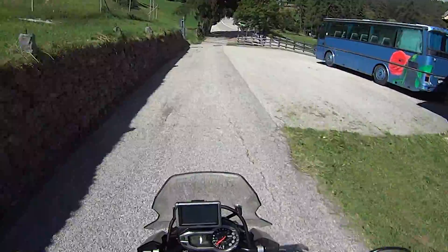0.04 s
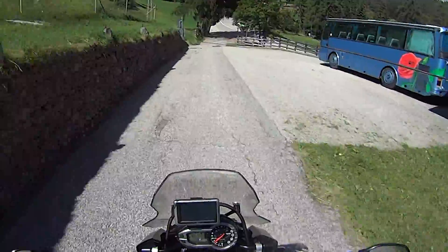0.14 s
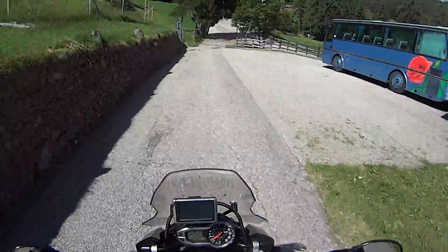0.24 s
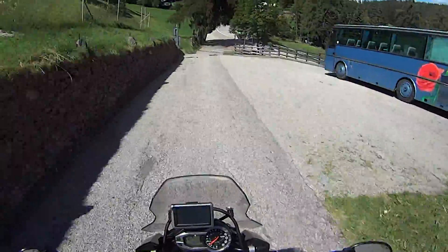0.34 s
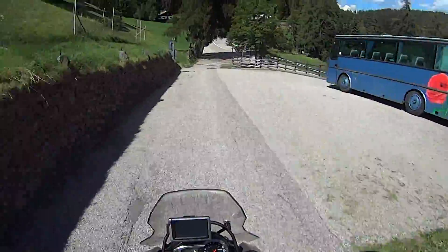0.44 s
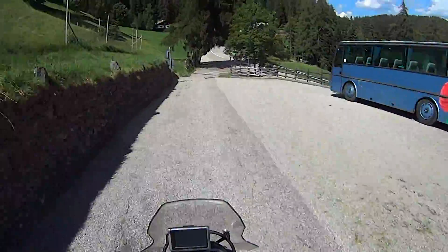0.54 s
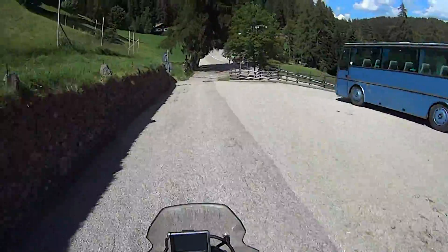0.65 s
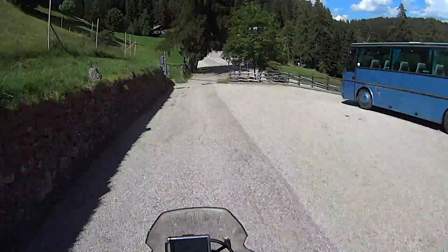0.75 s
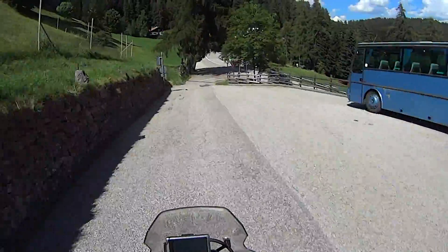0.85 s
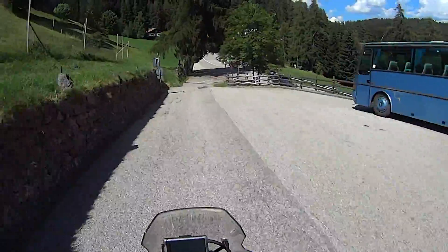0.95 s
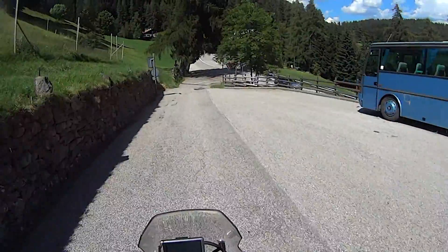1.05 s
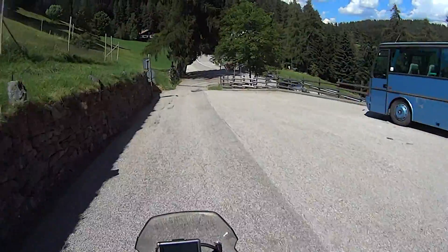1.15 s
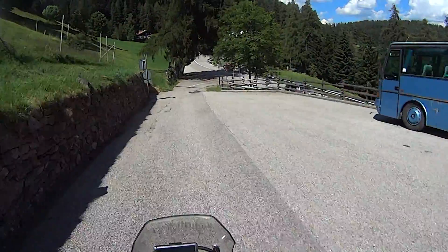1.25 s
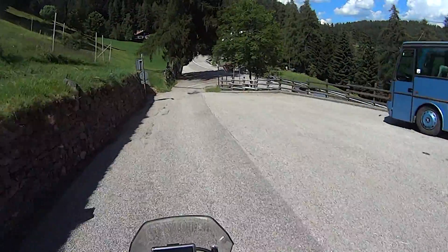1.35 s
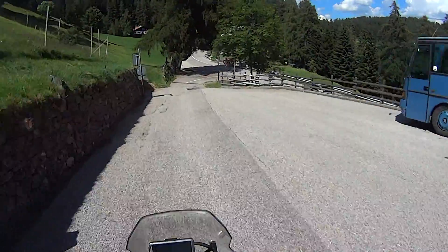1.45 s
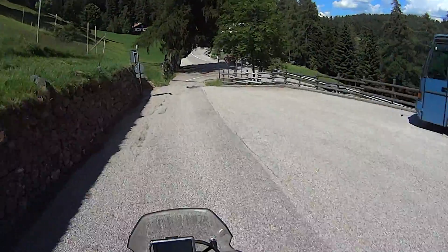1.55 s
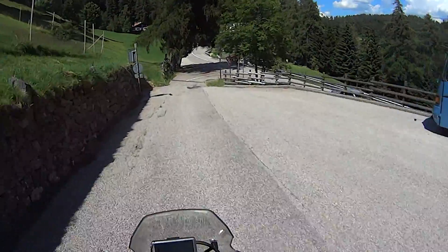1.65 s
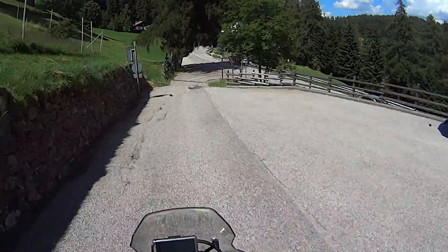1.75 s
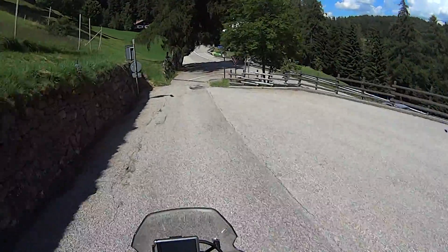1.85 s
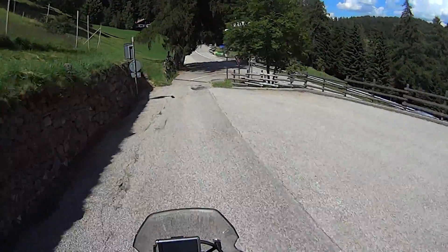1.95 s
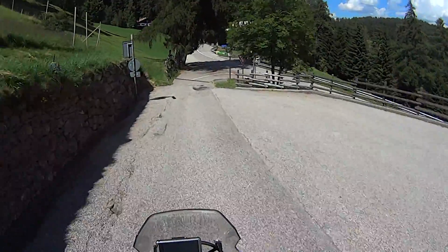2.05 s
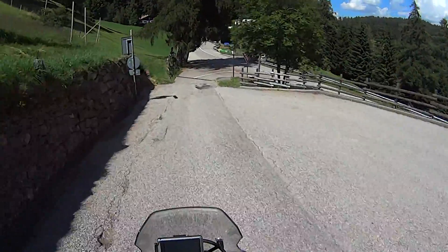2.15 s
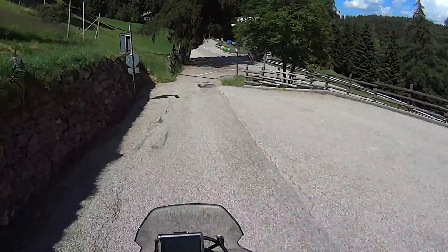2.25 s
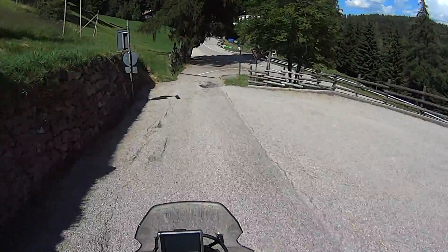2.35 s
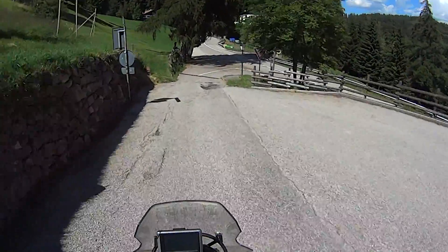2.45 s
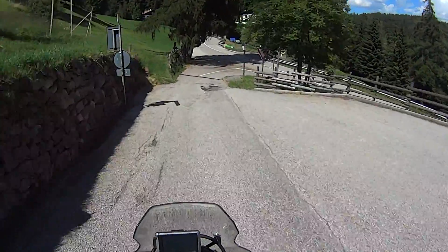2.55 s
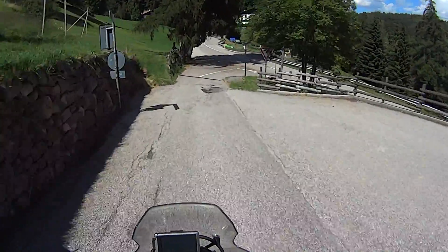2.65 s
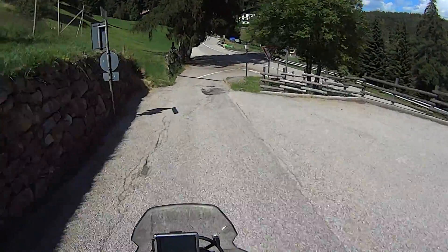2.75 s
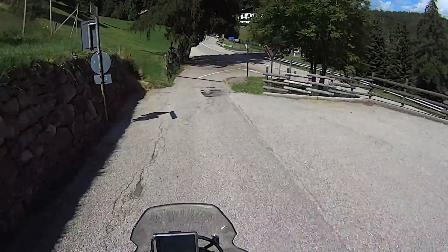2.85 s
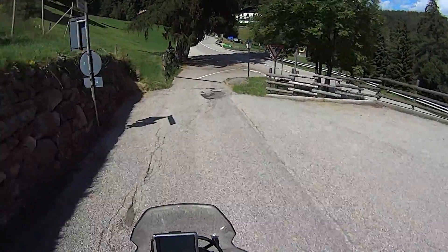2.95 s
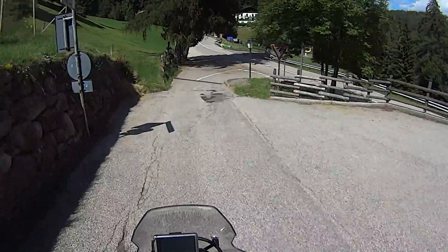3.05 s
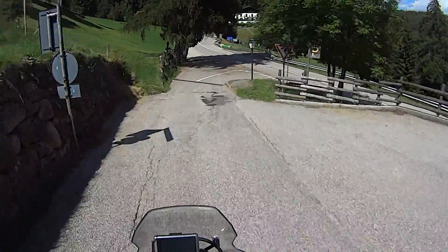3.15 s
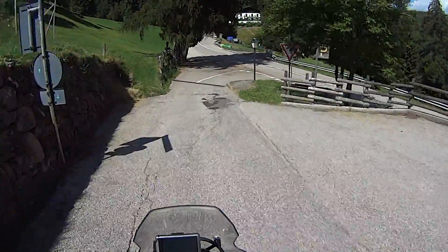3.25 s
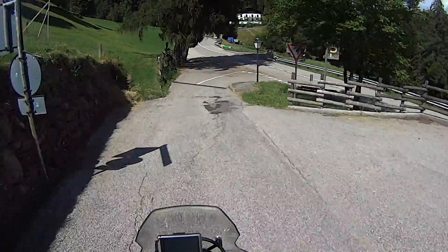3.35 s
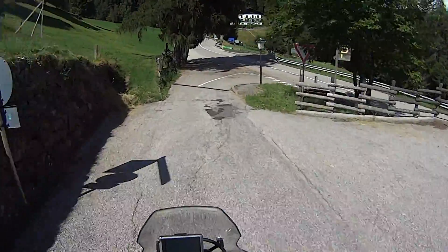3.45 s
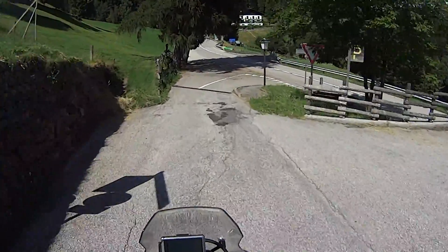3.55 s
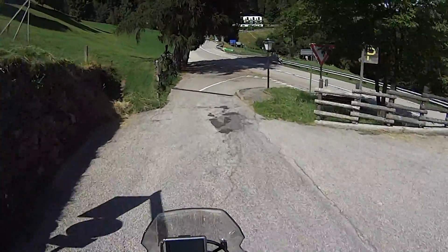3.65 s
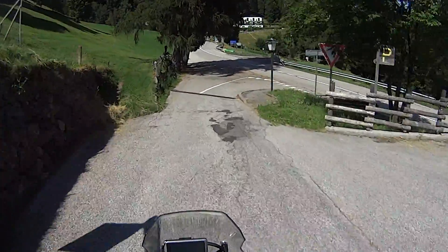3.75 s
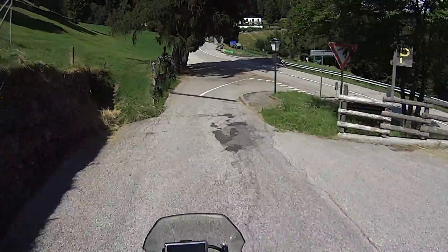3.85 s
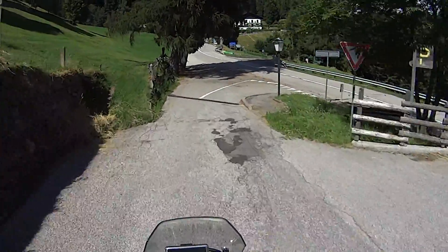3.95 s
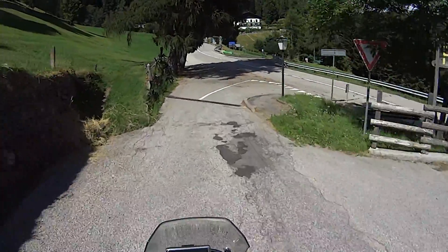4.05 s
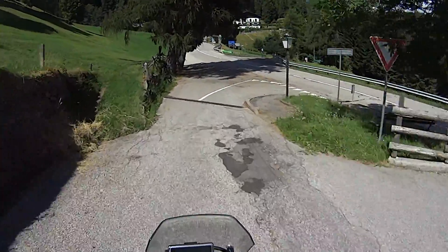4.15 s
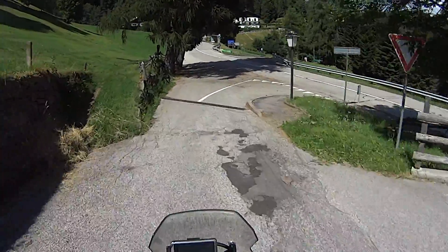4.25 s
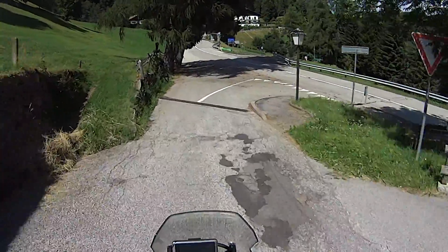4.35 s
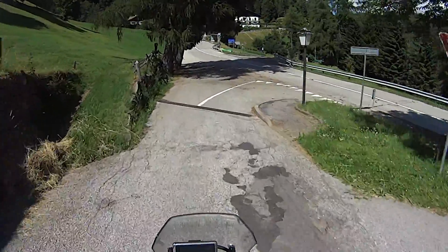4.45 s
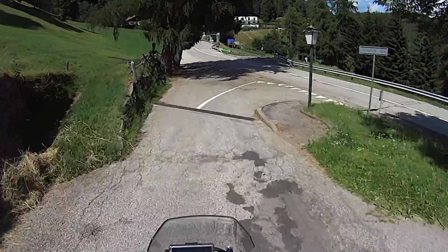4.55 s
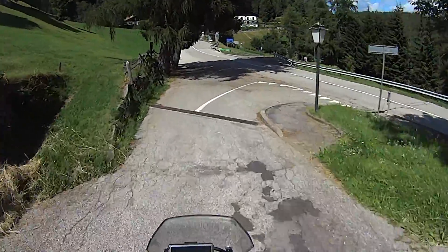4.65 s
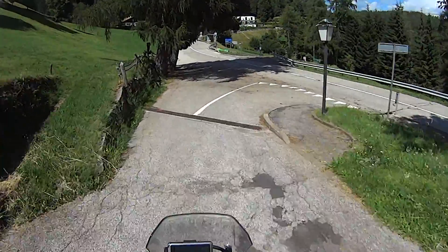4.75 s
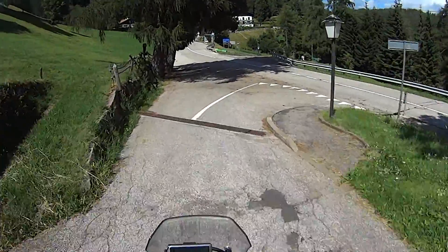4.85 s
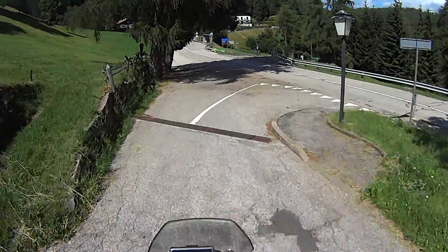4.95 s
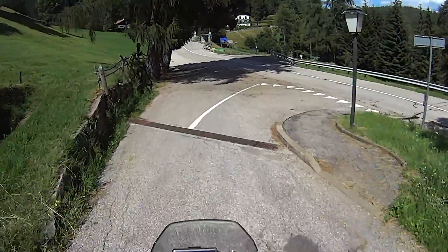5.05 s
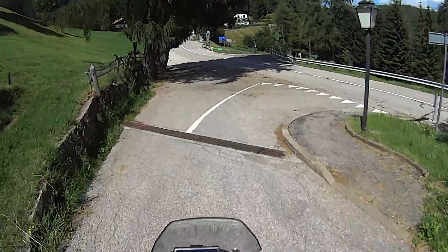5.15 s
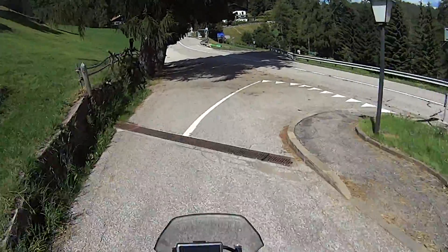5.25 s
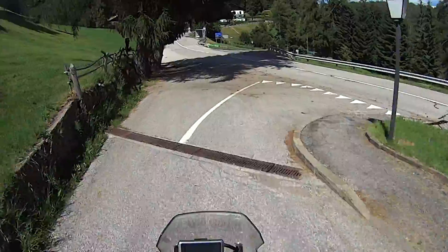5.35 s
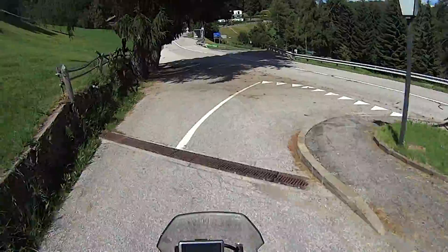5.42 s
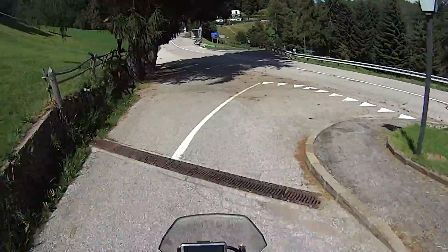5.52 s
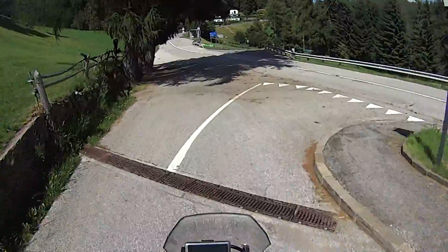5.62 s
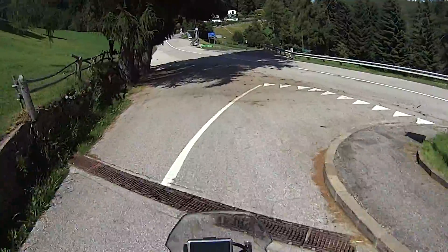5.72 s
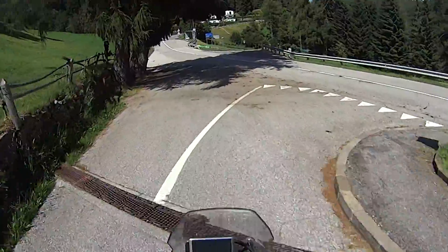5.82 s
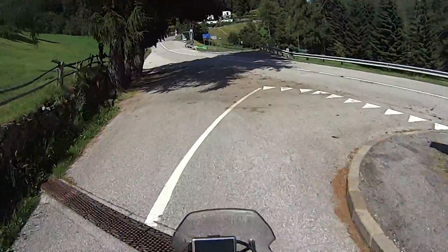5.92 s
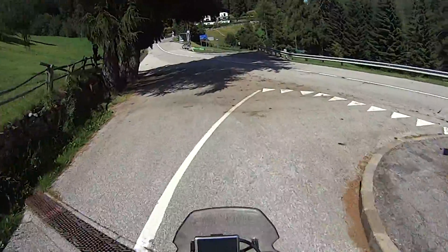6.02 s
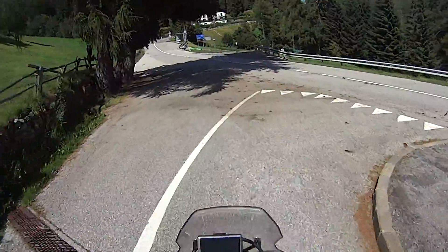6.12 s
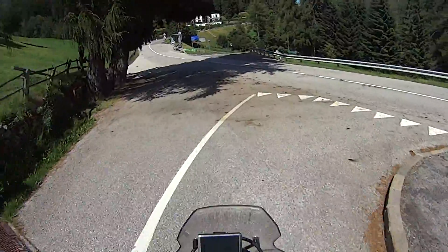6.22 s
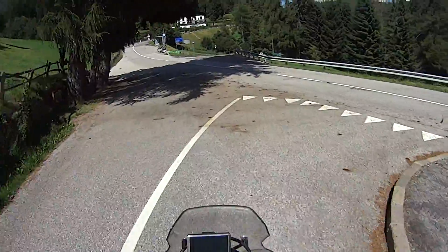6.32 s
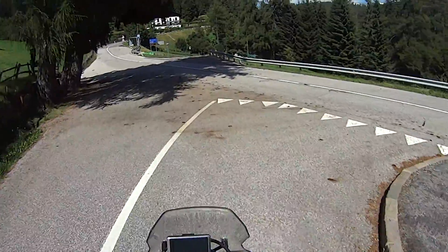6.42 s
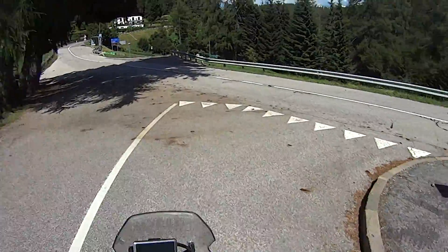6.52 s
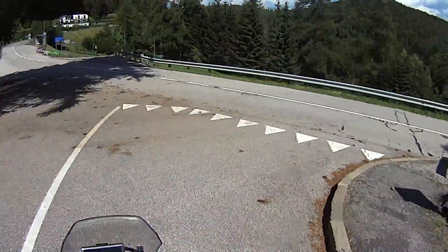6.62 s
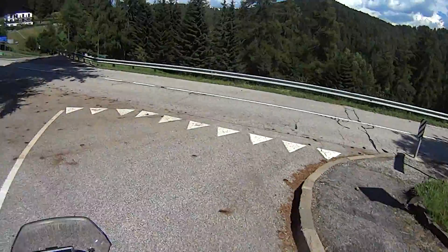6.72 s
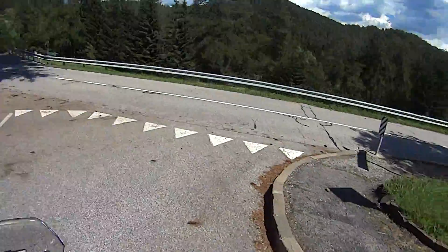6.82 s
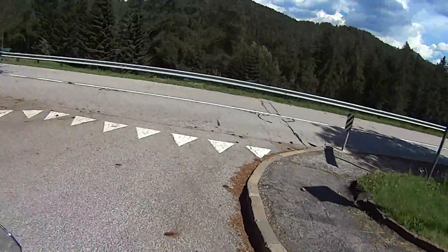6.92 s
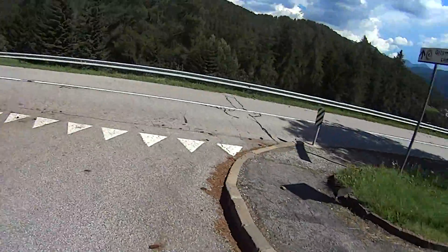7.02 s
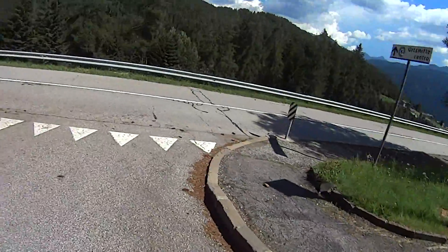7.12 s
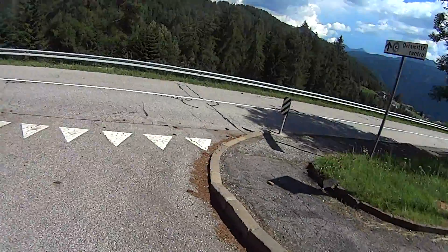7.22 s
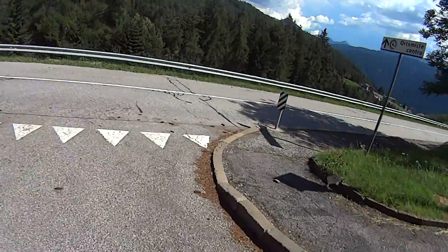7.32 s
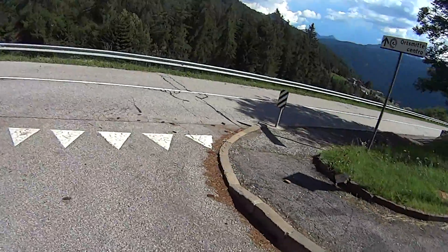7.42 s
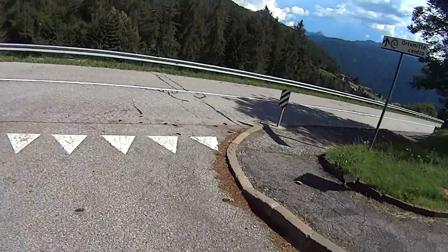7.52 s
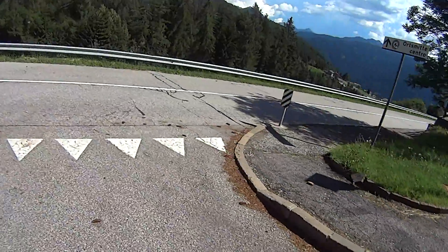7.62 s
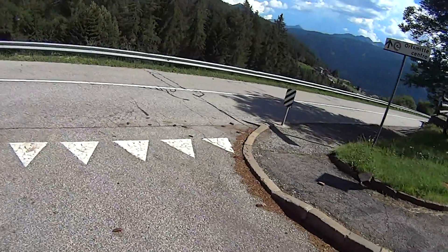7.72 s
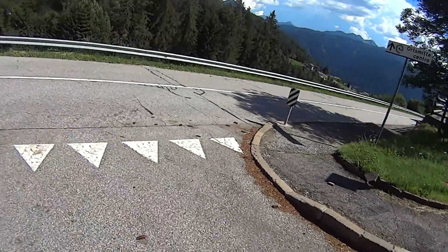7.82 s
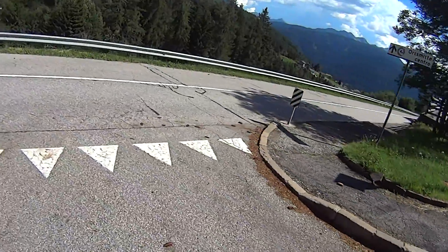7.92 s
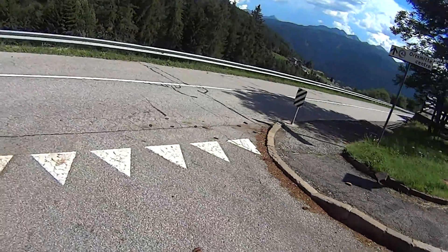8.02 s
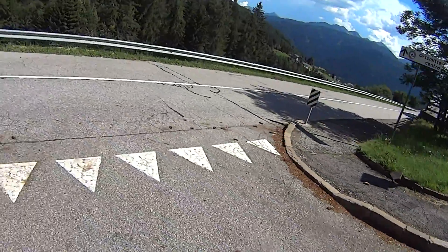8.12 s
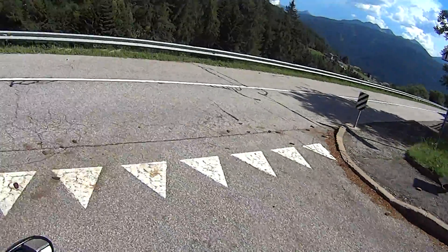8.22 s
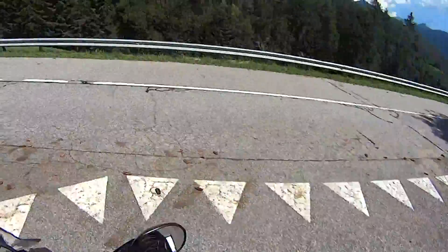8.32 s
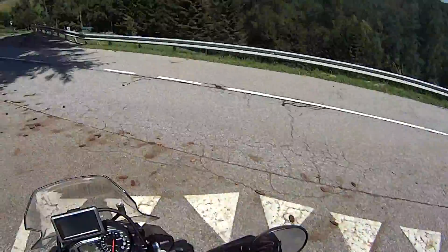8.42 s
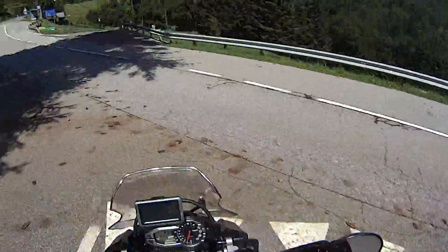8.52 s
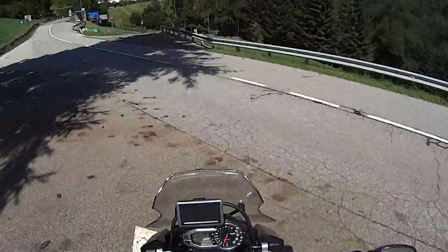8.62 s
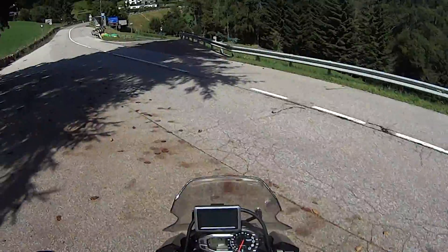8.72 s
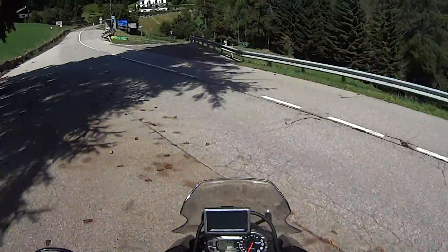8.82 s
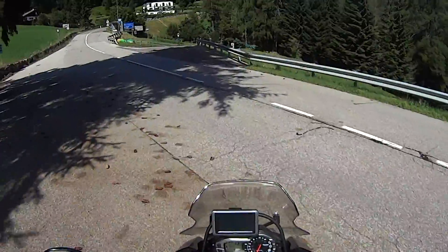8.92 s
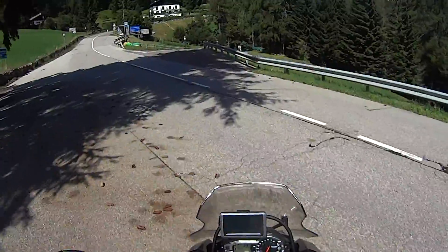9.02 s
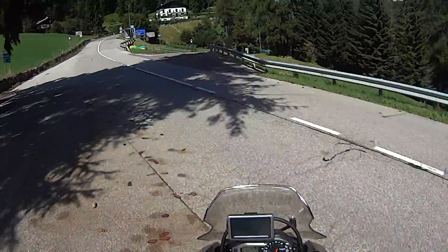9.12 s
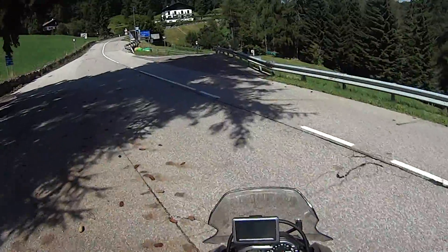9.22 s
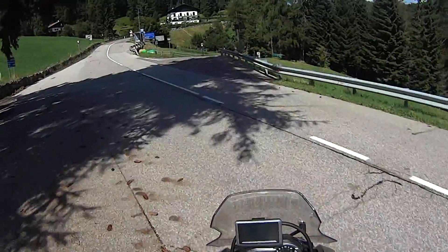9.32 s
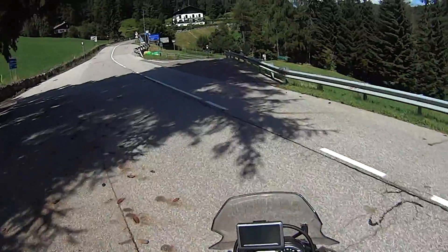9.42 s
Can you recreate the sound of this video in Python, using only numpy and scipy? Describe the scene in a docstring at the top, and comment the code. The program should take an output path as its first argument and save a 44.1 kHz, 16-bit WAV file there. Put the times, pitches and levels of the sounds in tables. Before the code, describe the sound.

A motorcycle engine clatters and whines as it coasts down a lane, drops to idle, clicks into gear and pulls away with a growl.

```python
"""A three-cylinder motorcycle engine, heard at the rider's helmet by two microphones in a closed housing: it slows
down a lane with little throttle, idles at a junction while the rider looks right, then pulls away.
Its clatter is noise struck in step with the firings, ringing the housing near 1.5 kHz. Under it lie exhaust
harmonics, gear and chain whine at the meshing rates, and filtered-noise rumble and hiss of tyres and wind.
Decaying bursts ring as knocks, most of them from the uneven road, and the gear lever clicks once."""
import sys
import numpy as np
from scipy import signal
from scipy.fft import rfft, irfft, next_fast_len
from scipy.io import wavfile
from scipy.ndimage import uniform_filter1d

SR = 44100
rng = np.random.default_rng(int(sys.argv[2]) if len(sys.argv) > 2 else 0)


def unload_audio(sound):
    """Save the sound as a 16-bit wav file, at the path given as the first command line argument."""
    columns = np.transpose(np.atleast_2d(sound))
    # keep every value between -1 and 1, then stretch to whole-number steps
    steps = np.round(np.clip(columns, -1, 1) * 32767)
    wavfile.write(sys.argv[1], SR, steps.astype(np.int16))


N = 417627

# Engine speed: (time [s], firing rate [Hz])
ENGINE_SPEED = [(0, 68.45), (.45, 63.1), (.9, 64.3), (2.3, 64.44), (2.55, 62.22), (3, 59.54), (4.3, 58.05),
                (4.7, 54.64), (5.1, 50.3), (5.4, 47.04), (5.8, 29.85), (5.95, 26.41), (6.8, 27.27),
                (7.62, 26.03), (7.96, 35.17), (8.11, 29.19), (8.79, 34.9), (9.47, 39.1)]
# Throttle opening: (time [s], opening [0-1])
THROTTLE_OPENING = [(.22, 0.72), (.4, 0), (2, 0.33), (7.62, 0), (7.9, 0.92), (9.47, 0.96)]
# Road speed, as the rate at which chain links meet the sprocket: (time [s], link rate [Hz])
LINK_RATE = [(0, 743), (1.5, 711), (2.6, 678.1), (4.3, 615), (4.7, 587), (5.45, 480), (6.5, 302),
             (7.6, 79.7), (9.47, 277.3)]
# Turning of the head to the right: (time [s], turn [0-1])
HEAD_TURN = [(6.5, 0.03), (7.05, 0.98), (8.2, 1), (8.55, 0.23)]
# Housing resonances: (frequency [Hz], width [Hz], relative level [dB], growth with engine speed [dB/octave],
# change with head turned [dB], left phase lead [rad], left minus right [dB])
HOUSING_MODES = [(1043, 130, -18.5, 1, 3.5, -2, 2), (1502.3, 175, 0, 0, 0.5, 0.29, 1.5),
                 (1634, 216, -1.5, -2.5, -1, 0.37, 1), (1993, 302, -12.5, -2, -6, 0.77, 1.5),
                 (2454, 680, -18.5, 0.5, -9, 1.34, 5), (2850, 310, -17, 5.5, 8.5, 1.9, 1),
                 (3155, 244, -18.5, -3.5, -13.5, 0.99, 0), (3650, 620, -29, 43, -17, -2.5, 2),
                 (4280, 560, -27, 5, 7, 1.5, -6.5), (4490, 154, -29.5, 1, 6.5, -1.5, 2),
                 (5160, 114, -25, -3.5, -5, 0.5, 1), (5310, 870, -27.5, 1, 0.5, 0.93, 0),
                 (7290, 860, -38.5, -1.5, -3, -1.5, 3.5)]
# Exhaust harmonics: (multiple of firing rate [1], relative level off throttle [dB], on throttle [dB])
EXHAUST_ORDERS = [(1, 1, -5.5), (2, -11.5, -6), (3, -17.5, -5.5), (4, -26.5, -8.5), (5, -16, -18.5),
                  (6, -32, -9.5), (7, -37, -10.5), (8, -19, -15.5), (9, -22, -12)]
# Swells of the coasting gears: (middle [s], half length [s], level [dB])
GEAR_SWELLS = [(2.13, 0.3, -37), (3.8, 1, -43), (5.2, 0.36, -38.5)]
# Spectrum of the rumble: (frequency [Hz], relative density [dB per Hz])
RUMBLE_SPECTRUM = [(20, -8.5), (45, -3), (85, 6.5), (120, -3.5), (165, -3.5), (235, -0.5), (350, -5),
                   (460, -2), (560, -3.5), (720, -1.5), (830, -10.5), (1100, -12.5), (1500, -43)]
# Spectrum of the hiss: (frequency [Hz], relative density [dB per Hz])
HISS_SPECTRUM = [(700, -2.5), (2400, 12.5), (4000, 1), (6400, -1.5), (7400, -1.5), (9300, 0), (11000, -8)]
# Likeness of the two microphones in the rumble: (frequency [Hz], correlation [-1 to 1])
MIC_CORRELATION = [(60, 0.98), (130, 0.92), (240, 0.61), (340, -0.025), (450, -0.34), (600, 0.13),
                   (730, 0.15), (900, 0.97)]
# Short knocks, most from the road; at 2.64 s a random burst in the rumble, at 7.295 s the gear lever:
# (time [s], blow level before ringing [dB], thud re blow [dB], rattle re blow [dB])
SHORT_KNOCKS = [(2.066, -27, -7, -22), (2.64, -21, -12, -21), (2.834, -25, -11, -15),
                (3.847, -28.5, -6, -13), (4.633, -28.5, -7, -13), (6.53, -33.5, -23, -19),
                (7.091, -34.5, -8, -26), (7.236, -33, -17, -30), (7.295, -28.5, -29, -23),
                (7.461, -38, -10, -24), (7.735, -33, -16, -15), (8.185, -34, -14, -24),
                (8.672, -41, -1, -5)]
# Hollow resonances excited by the knocks: (frequency [Hz], width [Hz], relative level [dB])
KNOCK_MODES = [(235, 138, -0.5), (341, 240, -7.5), (525, 66, 2), (686, 41, -1), (1110, 550, -9.5)]
# Resonances of the rattle: (frequency [Hz], width [Hz], relative level [dB])
RATTLE_MODES = [(1500, 1000, -4), (2760, 1200, -5), (4350, 700, -18)]
# Click of the gear lever into first: (time [s], level before ringing [dB])
LEVER_CLICK = (7.296, -27)
# Resonances of the lever: (frequency [Hz], width [Hz], relative level [dB])
LEVER_MODES = [(3475, 197, 2), (4290, 320, 3), (5000, 500, -8)]
# Loudness laws of the clatter, exhaust, gears, engine shaking and hiss:
# (level at CRUISE_HZ, closed throttle and top road speed [dB], growth with engine speed [dB/octave],
# rise at full throttle [dB], rise from rest to top road speed [dB])
CLATTER_LOUDNESS = (-24, 7.5, 2.1, 2.4)
EXHAUST_LOUDNESS = (-46.5, 11.5, 0.5, -4.5)
GEAR_LOUDNESS = (-45, 5, 0, 2)
SHAKE_LOUDNESS = (-49, 4.5, .8, -2)
HISS_LOUDNESS = (-46.5, 3, -.5, 2)

CRUISE_HZ = 68  # reference firing rate
CYLINDERS = 3
MESHES_PER_FIRING = 40
WIND_DB, WIND_POWER = -45, 2.6  # rumble at top road speed; exponent of its amplitude with speed
TOP_HZ = 11200  # upper limit of the pass band
T = np.arange(N) / SR
FFT_SIZE = next_fast_len(N)
FREQ = np.maximum(np.arange(FFT_SIZE // 2 + 1) * SR / FFT_SIZE, 1)


def undb(db):
    """Amplitude ratio: 20 dB is a factor of ten."""
    return 10 ** (np.asarray(db) / 20)


def unit(x):
    """Normalisation by power: scale to rms 1."""
    return x / np.sqrt(np.mean(x ** 2))


def curves(table):
    """Linear interpolation of each table column in time."""
    times, *columns = np.transpose(table)
    return [np.interp(T, times, column) for column in columns]


def over_hz(table):
    """Linear interpolation of (frequency, value) points over log frequency."""
    hz, value = np.transpose(table)
    return np.interp(np.log(FREQ), np.log(hz), value)


def filtered(x, response):
    """Linear filtering: multiply the spectrum by a frequency response."""
    return irfft(rfft(x, FFT_SIZE) * response, FFT_SIZE)[..., :N]


def resonance(hz, width):
    """Second-order resonance applied twice, for steeper skirts; width is that of one pass."""
    return (1 + 1j * (FREQ ** 2 - hz ** 2) / (FREQ * width)) ** -2


def ring(modes):
    """Modal superposition: the summed response of several resonances."""
    return sum(undb(db) * resonance(hz, width) for hz, width, db in modes)


def crossing(hz, centre_hz, width_hz):
    """Resonance curve: nearness of a gliding tone to a resonance, 0-1."""
    return 1 / (1 + ((hz - centre_hz) / width_hz) ** 2)


def ports(lead, pan_db):
    """Phase and level differences between microphones, as complex gains of the left and right one."""
    sides = np.array([[.5], [-.5]])
    return undb(sides * pan_db) * np.exp(1j * sides * lead)


def walk(rate):
    """Low-passed random steps: smooth wandering of rms 1."""
    hold = max(int(SR / rate), 1)  # samples per step
    steps = np.repeat(rng.standard_normal(N // hold + 1), hold)
    smooth = uniform_filter1d(uniform_filter1d(steps, hold), hold)
    return unit(smooth[:N])


def beats(turns, decay, scatter_db):
    """Periodic impact: a decaying burst of random strength at every whole turn; decay is in turns."""
    index = turns.astype(int)
    strength = undb(scatter_db * rng.standard_normal(index[-1] + 1))
    return strength[index] * np.exp(-(turns % 1) / max(decay, .02))


def loudness(law, hz):
    """Power-law radiation: level in dB against engine speed, with linear throttle and road-speed terms."""
    db, rev_db, throttle_db, speed_db = law
    throttle, = curves(THROTTLE_OPENING)
    link_hz, = curves(LINK_RATE)
    speed = link_hz / np.max(link_hz)
    return db + rev_db * np.log2(hz / CRUISE_HZ) + throttle_db * throttle + speed_db * (speed - 1)


def clatter(hz, firings, lope=0.032, steady=0.98, uneven_db=0.57):
    """Impact excitation: valves and pistons tap in step with the firings and ring the housing's modes."""
    level_db = loudness(CLATTER_LOUDNESS, hz) + uneven_db * walk(25)
    turn, = curves(HEAD_TURN)
    octaves = np.log2(hz / CRUISE_HZ)
    # the cylinders are unequal, so the clatter lopes once a cycle
    cycle = 1 + lope * np.cos(2 * np.pi * firings / CYLINDERS)
    spectrum = 0
    for mode_hz, width, db, rev_db, turn_db, lead, pan_db in HOUSING_MODES:
        # each resonance is struck by other parts, at another point of the stroke
        taps = beats(firings + rng.random(), decay=0.31, scatter_db=3.5)
        force = unit(cycle * (steady + 0.83 * taps))
        mode_db = level_db + db + rev_db * octaves + turn_db * turn
        drive = force * rng.standard_normal(N) * undb(mode_db)
        spectrum = spectrum + rfft(drive, FFT_SIZE) * resonance(mode_hz, width) * ports(lead, pan_db)
    return undb(18.5) * irfft(spectrum, FFT_SIZE)[:, :N]


def cam_tick(hz, firings, tick_hz=2130, width_hz=150, db=-24):
    """Subharmonic impact: the valve train ticks once a cycle, with more force at low engine speed."""
    force = beats(firings / CYLINDERS, decay=0.46, scatter_db=3.5) * np.min(hz) / hz
    response = resonance(tick_hz, width_hz) * ports(0.78, 2)
    return undb(db) * filtered(force * rng.standard_normal(N), response)


def exhaust(firings, hz, boom_hz=245, boom_width_hz=35, boom_db=6, low_cut_hz=33):
    """Harmonic series of the firing rate: opening the throttle changes its balance, and tones near 245 Hz boom."""
    throttle, = curves(THROTTLE_OPENING)
    level_db = loudness(EXHAUST_LOUDNESS, hz)
    hum = 0
    for order, off_db, on_db in EXHAUST_ORDERS:
        order_db = off_db + throttle * (on_db - off_db)
        swell_db = boom_db * crossing(order * hz, boom_hz, boom_width_hz)
        fade_db = 10 * np.log10(1 + (low_cut_hz / (order * hz)) ** 4)  # the deepest tones fade
        db = level_db + order_db + swell_db - fade_db + 2.1 * walk(15)
        hum = hum + undb(db) * np.sin(2 * np.pi * (round(order) * firings + rng.random()))
    return np.sqrt(2) * hum


def whine(hz, level_db, wander, flutter_db, lead):
    """Tooth meshing: a tone at the meshing rate, modulated at random in frequency and amplitude."""
    phase = 2 * np.pi * np.cumsum(hz * (1 + wander * walk(220))) / SR
    # quick flutter and slower patches
    flutter = unit(undb(flutter_db * (walk(90) + 0.99 * walk(7.5))))
    tone = np.real(np.sqrt(2) * np.exp(1j * phase) * ports(lead, 2.7))
    return undb(level_db) * flutter * tone


def gears(hz, firings, ripple=0.0062, housing_hz=1570, housing_width_hz=150, housing_db=16, turn_db=-5):
    """Torsional frequency modulation: firing pulses ripple the gear whine, which swells at the housing mode."""
    turn, = curves(HEAD_TURN)
    slowness = CRUISE_HZ / hz
    # the crank's speed ripples at each firing, most of all at idle
    mesh_hz = MESHES_PER_FIRING * hz * (1 + ripple * slowness * np.sin(2 * np.pi * firings))
    housing_swell_db = housing_db * crossing(MESHES_PER_FIRING * hz, housing_hz, housing_width_hz)
    level_db = loudness(GEAR_LOUDNESS, hz) + housing_swell_db + turn_db * turn
    rough = whine(mesh_hz, level_db, wander=.017 * slowness, flutter_db=3.5, lead=1.6 / slowness ** 3)
    # the coasting gears sing out more purely for a while
    swell = sum(undb(db) * np.exp(-((T - middle) / half) ** 2) for middle, half, db in GEAR_SWELLS)
    return rough + swell * whine(mesh_hz, 0, wander=0.009, flutter_db=0.5, lead=0.96)


def chain(db=-66, power=2.09, frame_hz=555, frame_width_hz=80, frame_db=18, second_db=-10):
    """Polygonal action: links meet the sprocket at a rate set by road speed, swelling at a frame resonance."""
    hz, = curves(LINK_RATE)
    speed_db = power * 20 * np.log10(hz / np.max(hz))
    level_db = db + speed_db + frame_db * crossing(hz, frame_hz, frame_width_hz)
    first = whine(hz, level_db, wander=0.0178, flutter_db=3, lead=0.41)
    second = whine(2 * hz, level_db + second_db, wander=0.011814, flutter_db=9.0, lead=.2)
    return first + second


def rumble(colour_db):
    """Partial coherence: low noise as sum and difference parts, alike in the deep bass, stronger left above."""
    alike = np.clip(over_hz(MIC_CORRELATION), -1, 1)
    mid, side = rng.standard_normal((2, N))
    mid = filtered(mid, np.sqrt(1 + alike))
    side = filtered(side, np.sqrt(1 - alike))
    # left minus right: (frequency [Hz], level [dB])
    left_db = over_hz([(100, .4), (330, 1.5), (600, 5.7), (1000, 1)])
    response = undb(over_hz(RUMBLE_SPECTRUM) + colour_db) * ports(0, left_db)
    return unit(filtered(np.array([mid + side, mid - side]), response))


def road(hz, bass_hz=170, wind_bass_db=3.5, shake_bass_db=-3):
    """Broadband flow and contact noise: tyres and wind grow with speed, over engine shaking and a smooth hiss."""
    link_hz, = curves(LINK_RATE)
    bass = 1 / (1 + (FREQ / bass_hz) ** 4)
    wind = rumble(wind_bass_db * bass) * undb(WIND_DB) * (link_hz / np.max(link_hz)) ** WIND_POWER
    shake = rumble(shake_bass_db * bass) * undb(loudness(SHAKE_LOUDNESS, hz))
    hiss = unit(filtered(rng.standard_normal((2, N)), undb(over_hz(HISS_SPECTRUM))))
    unevenness = unit(undb(1.45 * walk(25) + 0.72 * walk(110)))
    return (wind + shake) * unevenness + hiss * undb(loudness(HISS_LOUDNESS, hz))


def grit(db=-43, rate_hz=13, decay=0.067, scatter_db=3.0):
    """Random impact train: small flaws in the asphalt knock the bike faintly, at uneven intervals."""
    turns = np.cumsum(rate_hz * undb(4 * walk(12))) / SR
    force = unit(beats(turns, decay, scatter_db))
    return undb(db) * filtered(force * rng.standard_normal(N), ring(KNOCK_MODES) * ports(0.57, 2.5))


def short_knocks(decay_s=0.0033, tail_s=0.027, tail=0.12):
    """Impulse response: each brief blow excites a thud, a hollow knock and a short rattle."""
    push, shake, jangle = np.zeros((3, N))
    for start, db, thud_db, rattle_db in SHORT_KNOCKS:
        age = np.maximum(T - start, 0)
        decay = np.exp(-age / decay_s) + tail * np.exp(-age / tail_s)
        blow = undb(db) * (T >= start) * decay
        push = push + blow * undb(thud_db)
        shake = shake + blow
        jangle = jangle + blow * undb(rattle_db)
    thud = filtered(push, resonance(94, 94))
    knock = filtered(shake * rng.standard_normal(N), ring(KNOCK_MODES) * ports(0.92, 3))
    rattle = filtered(jangle * rng.standard_normal(N), ring(RATTLE_MODES) * ports(0.46, 1))
    return undb(12.5) * thud + undb(15.5) * knock + undb(21) * rattle


def shift(decay_s=.005):
    """Struck metal: a short noise burst rings the gear lever's modes as first gear engages."""
    start, db = LEVER_CLICK
    blow = (T >= start) * np.exp(-np.maximum(T - start, 0) / decay_s)
    return undb(db) * filtered(blow * rng.standard_normal(N), ring(LEVER_MODES) * ports(.6, 0))


def scene():
    """Superposition of engine, drive train and road, with one firing phase shared by the engine's parts."""
    hz, = curves(ENGINE_SPEED)
    firings = np.cumsum(hz * (1 + .007 * walk(20))) / SR
    engine = clatter(hz, firings) + cam_tick(hz, firings) + exhaust(firings, hz)
    drive_train = gears(hz, firings) + chain() + shift()
    return engine + drive_train + road(hz) + grit() + short_knocks()


def record(dry):
    """Band limitation: a steep elliptic low-pass removes the top of the spectrum."""
    low_pass = signal.ellip(12, .2, 80, TOP_HZ, fs=SR, output="sos")
    return signal.sosfilt(low_pass, dry)


dry = scene()
out = record(dry)
unload_audio(out)
```